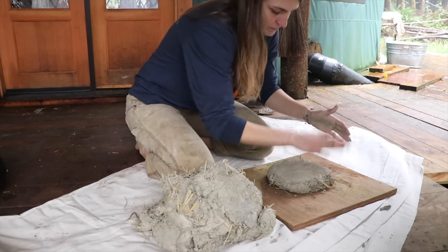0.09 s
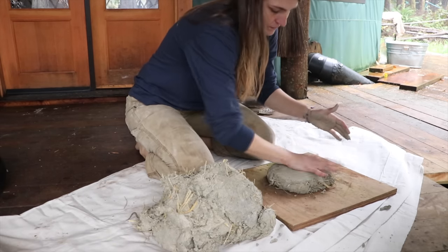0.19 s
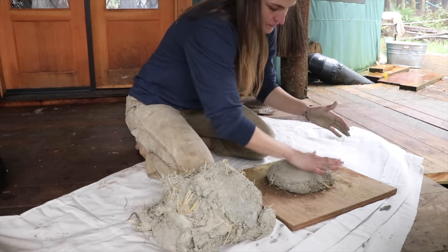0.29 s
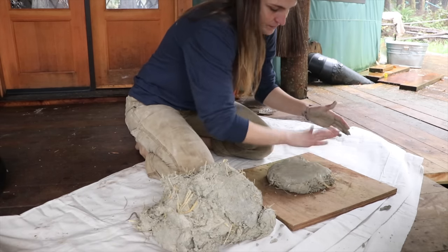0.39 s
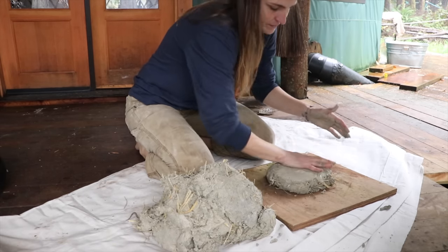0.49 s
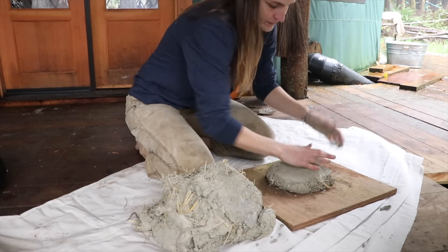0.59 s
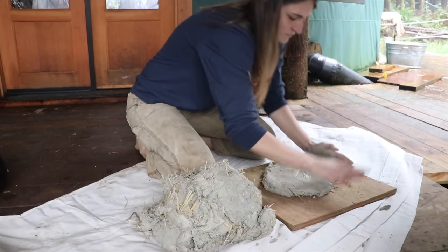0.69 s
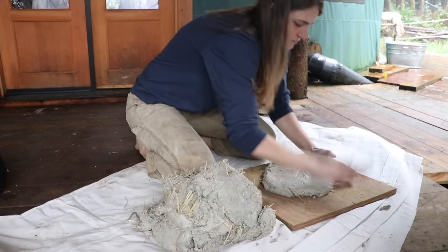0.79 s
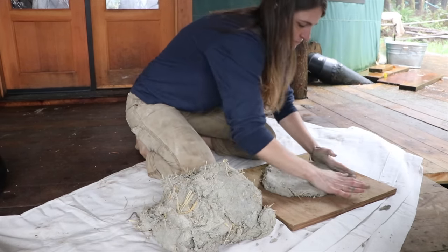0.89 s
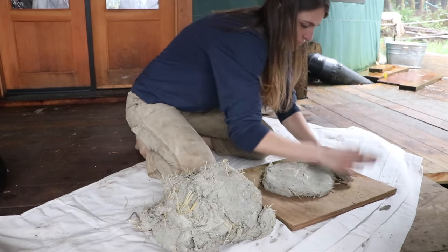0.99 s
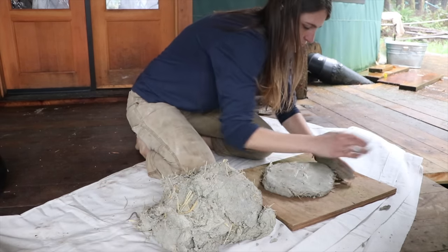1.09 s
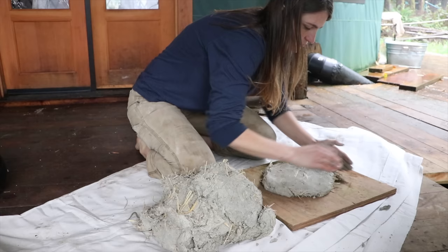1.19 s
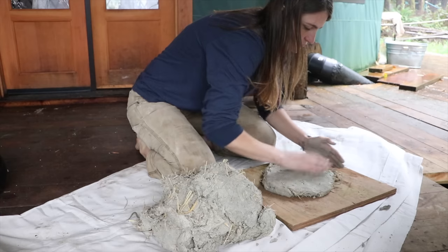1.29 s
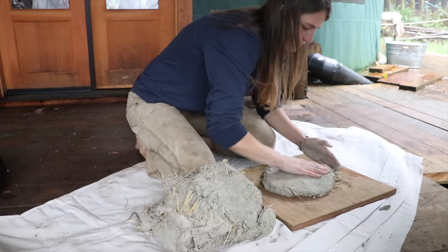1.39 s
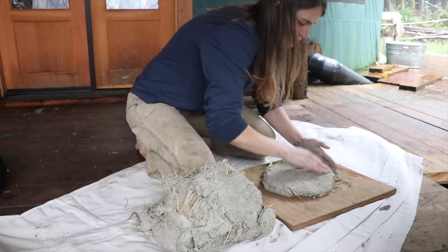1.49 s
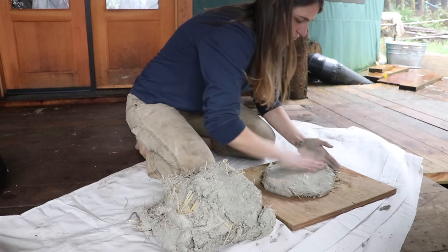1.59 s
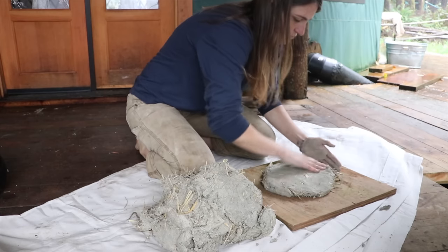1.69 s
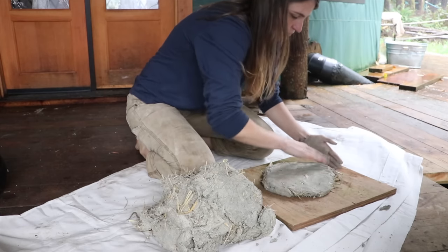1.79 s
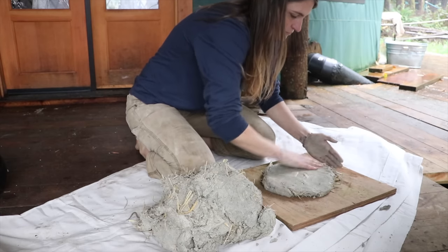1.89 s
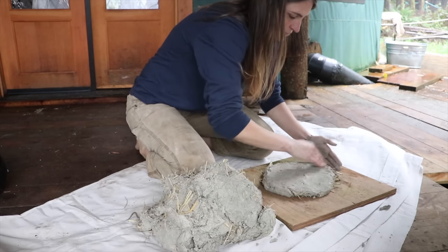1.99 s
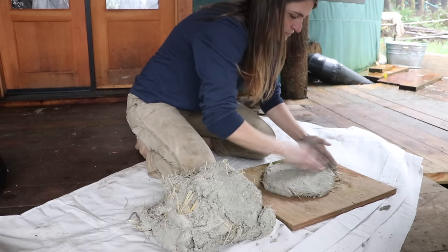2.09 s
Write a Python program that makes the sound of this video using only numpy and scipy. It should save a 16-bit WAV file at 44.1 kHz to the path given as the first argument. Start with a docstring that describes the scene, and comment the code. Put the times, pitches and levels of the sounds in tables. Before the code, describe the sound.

Bare hands slap a wet clay and straw cake on a wooden board, three sharp smacks in the first second, then faint pats and sticky crackles; plank porch, light distant rain, close microphone slightly overloaded.

```python
"""On a plank porch, light rain hisses far off over a low rumble, and wet clay and straw crackle under fingers.
A faint thud comes first; then hands slap the clay cake on a wooden board three times: noise bursts and
air pops lead into dying wet splatter, while sine modes ring in board and planks and the porch answers.
Soft pats follow, with more crackle (grainy noise) and single wet ticks (rough noise through resonances).
The microphone hears little deep bass from the blows; the loudest peaks overload."""
import sys
import numpy as np
from scipy import signal
from scipy.fft import rfft, irfft
from scipy.io import wavfile
from scipy.ndimage import uniform_filter1d

SR = 44100
rng = np.random.default_rng(int(sys.argv[2]) if len(sys.argv) > 2 else 0)


def int16_out(signal):
    """Quantize to a 16-bit WAV file."""
    q = np.round(np.clip(np.atleast_2d(signal).T, -1, 1) * 32767)
    wavfile.write(sys.argv[1], SR, q.astype(np.int16))


def gain_from_db(level_db):
    """Convert decibel levels to linear amplitude factors (20 dB per decade)."""
    decades = np.asarray(level_db, float) / 20
    return 10 ** decades


N = 94815  # samples

# far rain, spectrum shape: f/Hz, relative density level/dB per Hz
RAIN_SPECTRUM = [(15, -64), (25, -54), (111, -13), (166, -5), (344, -5.5), (439, -3.5), (607, -5),
                 (677, -6), (887, -5.5), (1190, -5), (1440, -4), (2350, -11), (3920, -3.5), (5140, -18.5),
                 (16000, -38.5)]
# far rain, course before the waver: t/s, level/dB
RAIN_LEVEL = [(0, -44.5), (.3, -40.5), (.66, -46), (0.751, -42.5), (1.2, -42.5), (1.6, -43.5),
              (1.95, -44.5), (2.15, -42)]
# low rumble, spectrum shape: f/Hz, relative density level/dB per Hz
RUMBLE_SPECTRUM = [(20, 0), (50, -9.5), (100, -0.5), (160, -6.5), (260, -43)]
# low rumble, course: t/s, level/dB
RUMBLE_LEVEL = [(0, -34), (.15, -57.5), (.4, -53), (.65, -53), (.72, -49), (.8, -51), (1.04, -50),
                (1.12, -66), (1.6, -62.5), (2.15, -66)]
# clay and straw under the moving hand: t/s, length/s, body level/dB, treble level/dB
CRACKLES = [(0.0, 0.021, -35, -60), (0.035, 0.0098, -41, -37), (0.281, 0.027, -60, -48),
            (0.317, 0.013, -44, -42), (0.554, 0.011, -44, -46), (0.574, 0.029, -56, -49.5),
            (0.7, 0.018, -41, -67), (0.786, 0.024, -42, -55.5), (0.903, 0.033, -43.5, -44),
            (1.032, 0.0042, -54, -48.5), (1.033, 0.013, -39, -61), (1.064, 0.033, -34, -52),
            (1.124, 0.054, -42, -69), (1.298, .025, -43, -76), (1.337, 0.028, -38, -52),
            (1.42, 0.013, -66, -46.5), (1.462, .005, -56, -54), (1.475, 0.021, -38.5, -60),
            (1.497, 0.0046, -57, -50), (1.5, 0.021, -49, -54), (1.512, 0.0028, -57, -44),
            (1.523, 0.0076, -48, -41.5), (1.621, 0.0071, -38, -43.5), (1.658, 0.025, -41.5, -53),
            (1.7, 0.057, -55, -57), (1.763, .042, -37.5, -47), (1.817, 0.039, -45.5, -76),
            (1.857, .012, -44.5, -63), (1.873, 0.0034, -41.5, -39), (1.91, 0.032, -60, -52),
            (1.932, 0.0029, -53, -51), (1.949, 0.0044, -59, -48), (1.959, 0.027, -76, -49.5),
            (1.992, 0.004, -41, -49), (2.001, 0.026, -78, -51.5), (2.127, 0.011, -43, -54)]
# crackle body, spectrum shape: f/Hz, relative density level/dB per Hz
CRACKLE_BODY = [(120, -36), (200, -6), (810, -8.5), (997, -13), (1860, -6.5), (2510, -13.5), (3040, -14.5),
                (3980, -4.5), (4830, -29.5), (7000, -21.5), (9100, -28), (15400, -120)]
# crackle treble, spectrum shape: f/Hz, relative density level/dB per Hz
CRACKLE_TREBLE = [(3240, -46), (5500, -9.5), (9320, -5.5), (10100, -7), (11300, -8), (13500, -3.5),
                  (16000, -4.5)]
# thuds into the planks from slaps and soft pats: t/s, drive level/dB, tilt/dB per octave about 125 Hz
THUDS = [(0.002, -39, 12.5), (0.207, -15, -6), (0.471, -19.5, -23), (0.696, -45.5, 0), (0.845, -11.5, -7.5),
         (0.883, -21, -8), (0.93, -34, -23), (1.026, -45, -11), (1.344, -44, 13), (1.627, -33.5, 6.5),
         (1.873, -27.5, -2.5), (2.13, -33, -14)]
# porch plank modes: f/Hz, relative level/dB, t60/s
PLANK_MODES = [(97.5, -11.5, 0.12), (114.2, 5.5, 0.092), (143.5, -4.5, 0.2), (191.6, -11, 0.05),
               (326, -7.5, .12)]
# porch echo bands: centre f/Hz, relative level/dB, t60/s
PORCH_BANDS = [(103, -7.5, 0.17), (197, -11, 0.23), (347, -5, .25), (600, -3.5, 0.18), (970, -8.5, 0.23),
               (1780, -7, 0.22), (3800, -12, 0.23), (8000, -14, 0.17)]
# slaps: t/s, smack drive level/dB, smack length/s, fingertip drive level/dB, splat start level/dB
SLAPS = [(0.2003, -0.5, 0.002, -24, -13), (0.4657, -1, 0.0015, -36, -26), (0.8453, -7.5, 0.0018, -21, -24)]
# smack noise before its low cut, spectrum shape: f/Hz, relative density level/dB per Hz
SMACK_SPECTRUM = [(500, -14), (1200, -18), (2200, -14), (3640, -11.5), (5250, -24.5), (6500, -34),
                  (7500, -25), (10000, -26.5), (14200, -31), (16000, -55)]
# wet splatter, spectrum shape: f/Hz, relative density level/dB per Hz
SPLAT_SPECTRUM = [(530, -29), (900, 2), (1220, -4), (1770, -1.5), (2500, -8), (3770, 3), (6250, -19),
                  (11700, -35), (14200, -39), (16000, -34)]
# air pockets popping under the palm, and a bright ring in the third smack (the 3810 Hz row): t/s, drive
# level/dB, f/Hz, t60/s
POPS = [(0.2017, 4.5, 550, 0.0093), (0.4655, 5, 600, 0.014), (0.843, -19.5, 433, 0.054),
        (0.8456, -1.5, 3810, 0.0078)]
# board under slaps and firmer pats: t/s, push drive level/dB, push f/Hz, ring drive level/dB
PUSHES = [(0.2057, 2, 155, -12), (0.471, 2, 213, -16.5), (0.849, -11, 118, -45), (1.346, -25, 178, -47.5),
          (1.627, -29.5, 175, -47), (1.878, -22.5, 152, -52)]
# board modes: f/Hz, relative level/dB, t60/s
BOARD_MODES = [(274, -3, 0.053), (405.8, 1, .15), (534, 0.5, 0.13), (568, -2, 0.17), (693.5, -3.5, 0.11),
               (787, -7.5, 0.14), (850, -22, .12), (1230, -7.5, 0.066)]
# single ticks as clay lets go of the skin: t/s, rough drive level/dB, f/Hz
TICKS = [(0.923, -41, 6760), (1.477, -34, 3800), (1.629, -41, 5930), (1.625, -36.5, 1050),
         (1.639, -35.5, 3500), (1.996, -27, 3970), (1.996, -39.5, 1650)]

RAIN_WAVER_DB, DROPS_PER_S = 1.0, 4000
DROP_SHARE = 0.35  # rms of drops relative to the hiss
GRAINS_PER_S, GRAIN_SPREAD_DB = 5000, 3.5
SMOOTH_SHARE = 1.2  # rms of smooth rub relative to its ticks
RISE_SHARE, FADE_SHARE = 0.28, 0.4  # rise time and fade constant, relative to crackle length
PLANK_LOW_HZ, PLANK_HIGH_HZ = 81, 307
PORCH_GAP_S = 0.0024
FINGER_LEAD_S, SMACK_FADE_S, SMACK_CUT_HZ = 0.0031, 0.00051, 730
SPLAT_RISE_S, SPLAT_T60_S = 0.004, 0.22
PUSH_T60_S, PUSH_CUT_HZ = 0.026, 420
TICK_CONTACT_S, TICK_T60_S = 0.004, 0.0052  # t60 of each of two passes
BASS_CUT_HZ = 75
CLIP_TOP, TOP_CUT_HZ = 1.0, 16700


def rms_one(x):
    """Scale a signal to rms 1."""
    return x / np.sqrt(np.mean(x ** 2) + 1e-20)


def butter(x, order, hz, kind):
    """Pass a signal through a Butterworth filter."""
    return signal.sosfilt(signal.butter(order, hz, kind, fs=SR, output="sos"), x)


def colour(x, points):
    """Shape noise by a spectrum table, straight in dB over log frequency; rms 1."""
    hz, db = np.transpose(points)
    f = np.maximum(np.arange(len(x) // 2 + 1) * SR / len(x), 1)
    gain = gain_from_db(np.interp(np.log(f), np.log(hz), db))
    return rms_one(irfft(rfft(x) * gain, len(x)))


def ring(drive, hz, t60):
    """A two-pole resonance: a unit click sets a sine of starting height 1 ringing."""
    r = gain_from_db(-60 / (t60 * SR))
    w = 2 * np.pi * hz / SR
    return signal.lfilter([0, np.sin(w)], [1, -2 * r * np.cos(w), r * r], drive + 1e-18)


def clicks(s, gain):
    """One single-sample click per time."""
    out = np.zeros(N)
    places = np.clip((np.asarray(s) * SR).astype(int), 0, N - 1)
    np.add.at(out, places, gain)
    return out


def grains(rate):
    """Random ticks of uneven size and either sign."""
    struck = rng.random(N) < rate / SR
    size = gain_from_db(GRAIN_SPREAD_DB * np.minimum(rng.exponential(1, N), 5))
    return struck * size * rng.choice([-1, 1], N)


def rain():
    """Far rain: many drops blend into noise, a share stay single; the level wavers a little."""
    s, db = np.transpose(RAIN_LEVEL)
    waver = rng.standard_normal(N)
    for _ in range(2):
        waver = uniform_filter1d(waver, size=1500)
    level = gain_from_db(np.interp(np.arange(N) / SR, s, db) + RAIN_WAVER_DB * rms_one(waver))
    wet = rng.standard_normal(N) + DROP_SHARE * rms_one(grains(DROPS_PER_S))
    return level * colour(wet, RAIN_SPECTRUM)


def rumble():
    """Low-pitched noise that settles after the heavy slaps."""
    s, db = np.transpose(RUMBLE_LEVEL)
    level = gain_from_db(np.interp(np.arange(N) / SR, s, db))
    return level * colour(rng.standard_normal(N), RUMBLE_SPECTRUM)


def crackles():
    """Many small wet ticks on a smooth rub swell and fade with each movement of the hand."""
    t = np.arange(N) / SR
    body, treble = np.zeros(N), np.zeros(N)
    for s, length, body_db, treble_db in CRACKLES:
        rise = np.clip((t - s) / (RISE_SHARE * length), 0, 1)
        fade = np.exp(-np.maximum(t - s - length, 0) / (FADE_SHARE * length))
        body += gain_from_db(body_db) * rise * fade
        treble += gain_from_db(treble_db) * rise * fade
    rub = rms_one(grains(GRAINS_PER_S)) + SMOOTH_SHARE * rng.standard_normal(N)
    return body * colour(rub, CRACKLE_BODY) + treble * colour(grains(GRAINS_PER_S), CRACKLE_TREBLE)


def planks():
    """Each thud rings the porch plank modes, tilted toward the low or the high ones."""
    s, db, tilt = np.transpose(THUDS)
    out = 0
    for hz, level_db, t60 in PLANK_MODES:
        drive = gain_from_db(db + level_db + tilt * np.log2(hz / 125))
        out = out + ring(clicks(s, drive), hz, t60)
    return butter(out, 3, [PLANK_LOW_HZ, PLANK_HIGH_HZ], "band")


def porch(x):
    """Dense echoes from walls and roof: convolution with noise that dies band by band."""
    t = np.arange(SR // 2) / SR
    hz = np.array([row[0] for row in PORCH_BANDS])
    edges = np.r_[60, np.sqrt(hz[1:] * hz[:-1]), 16000]
    echo = 0
    for (_, db, t60), low, high in zip(PORCH_BANDS, edges, edges[1:]):
        band = butter(rng.standard_normal(len(t)), 2, [low, high], "band")
        even = np.sqrt(2 * np.log(1000) / (t60 * SR))  # offsets the extra energy of a longer decay
        echo = echo + gain_from_db(db) * band * gain_from_db(-60 * t / t60) * even
    onset = np.clip(t / PORCH_GAP_S - 1, 0, 1)  # silent for one gap, full after two
    return signal.fftconvolve(x, echo * onset)[:N]


def smacks():
    """Fingertips lead softly, bright noise bursts out, air pockets pop, then wet spatter dies away."""
    t = np.arange(N) / SR
    bright, splat = 0, 0
    for s, db, length, lead_db, splat_db in SLAPS:
        lead = (t < s) * np.sqrt(np.clip(1 + (t - s) / FINGER_LEAD_S, 0, 1))
        main = (t >= s) * np.exp(-np.maximum(t - s - length, 0) / SMACK_FADE_S)
        bright = bright + gain_from_db(db) * main + gain_from_db(lead_db) * lead
        after = np.maximum(t - s, 0)
        rise = np.clip(after / SPLAT_RISE_S, 0, 1)
        splat = splat + gain_from_db(splat_db - 60 * after / SPLAT_T60_S) * rise
    burst = bright * colour(rng.standard_normal(N), SMACK_SPECTRUM)
    air = butter(burst, 4, SMACK_CUT_HZ, "high")
    pops = sum(ring(clicks([s], -gain_from_db(db)), hz, t60) for s, db, hz, t60 in POPS)
    return air + pops, splat * colour(rng.standard_normal(N), SPLAT_SPECTRUM)


def board():
    """The board dips under each blow in one heavy damped swing and rings on in its modes."""
    s, _, _, ring_db = np.transpose(PUSHES)
    swing = sum(ring(clicks([a], -gain_from_db(db)), hz, PUSH_T60_S) for a, db, hz, _ in PUSHES)
    out = butter(swing, 2, PUSH_CUT_HZ, "low")
    for k, (hz, db, t60) in enumerate(BOARD_MODES):
        sign = (-1) ** k  # neighbouring modes start in opposite directions
        out = out + ring(clicks(s, gain_from_db(ring_db + db) * sign), hz, t60)
    return out


def ticks():
    """A few ms of rough contact ring a small wet cavity, a narrow resonance passed twice."""
    t = np.arange(N) / SR
    rough = rng.standard_normal(N)
    decay = np.log(1000) / (TICK_T60_S * SR)  # per sample; scales the second pass
    out = 0
    for s, db, hz in TICKS:
        contact = gain_from_db(db) * rough * (t >= s) * (t < s + TICK_CONTACT_S)
        first = ring(contact, hz, TICK_T60_S)
        out = out + ring(decay * first, hz, TICK_T60_S)
    return out


def scene():
    """Blows with their porch echoes, short of deep bass, over crackle, rumble and far rain."""
    air, splat = smacks()
    blows = air + board() + planks()
    blows = butter(blows + porch(blows), 3, BASS_CUT_HZ, "high")
    return (blows + splat + crackles() + ticks() + rumble() + rain())[None]


def low_pass(x):
    """Removes everything above the highest recorded frequency."""
    return signal.sosfilt(signal.butter(12, 16370, fs=SR, output="sos"), x)


def record(dry):
    """At the microphone the loudest peaks overload, flattened at full scale; then the top is cut."""
    clipped = np.clip(dry, -CLIP_TOP, CLIP_TOP)
    top_cut = signal.cheby2(12, 60, TOP_CUT_HZ, fs=SR, output="sos")
    mix = signal.sosfilt(top_cut, clipped)
    return low_pass(mix)


dry = scene()
out = record(dry)
int16_out(out)
```